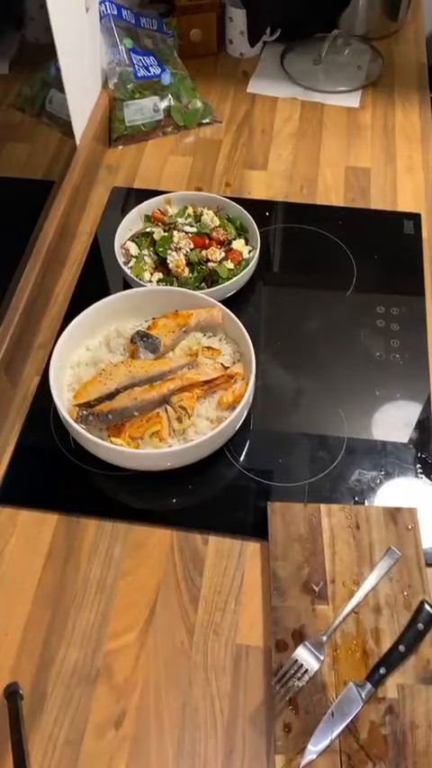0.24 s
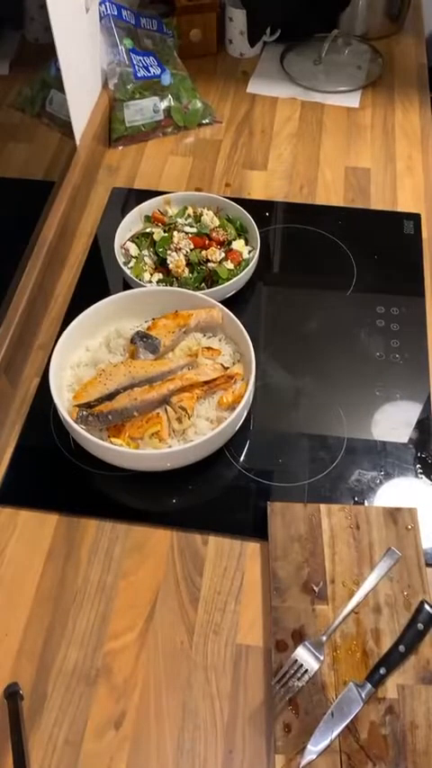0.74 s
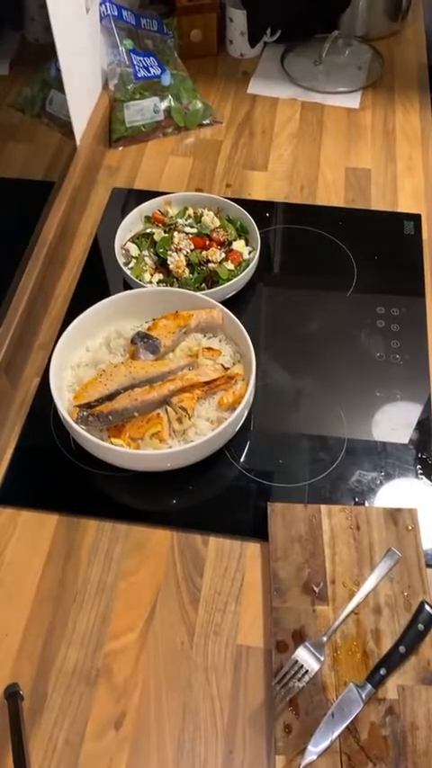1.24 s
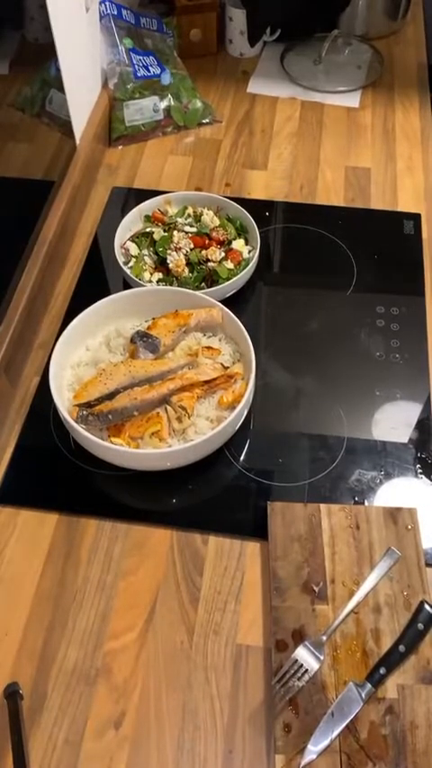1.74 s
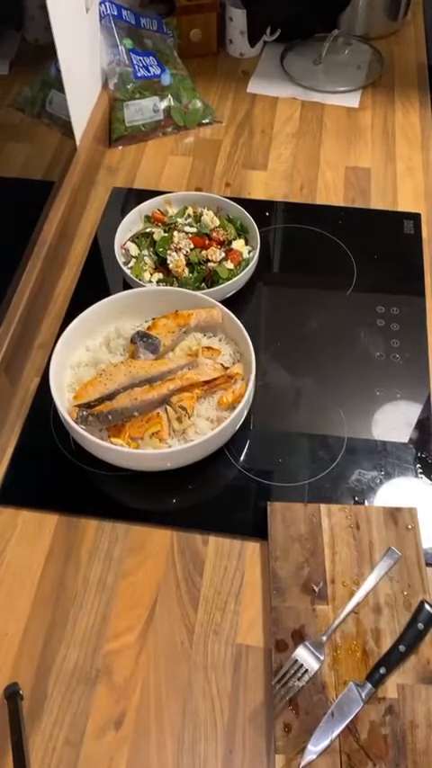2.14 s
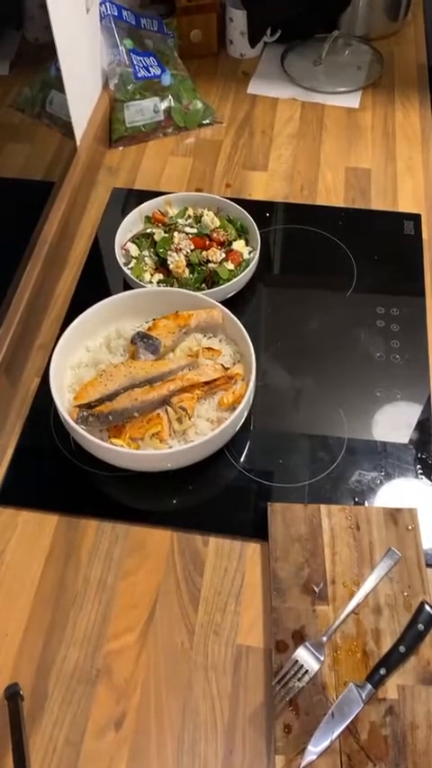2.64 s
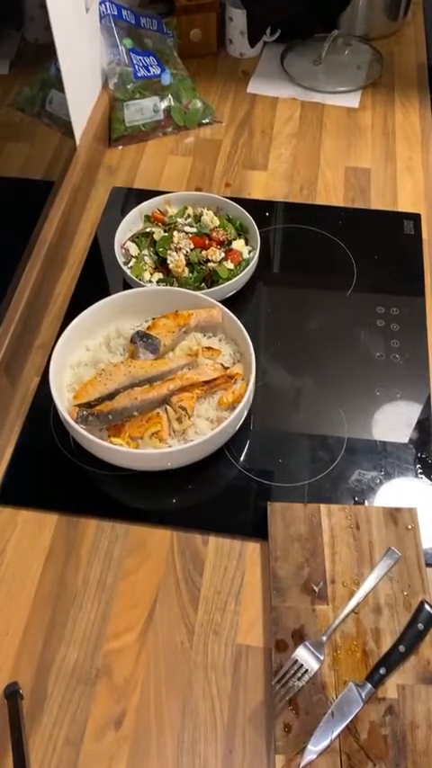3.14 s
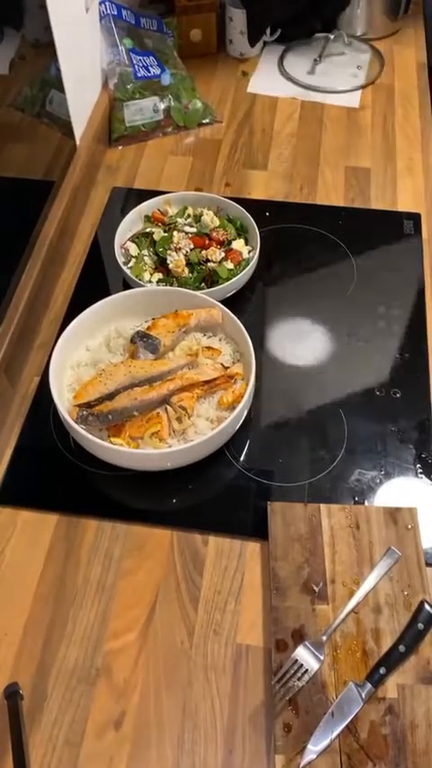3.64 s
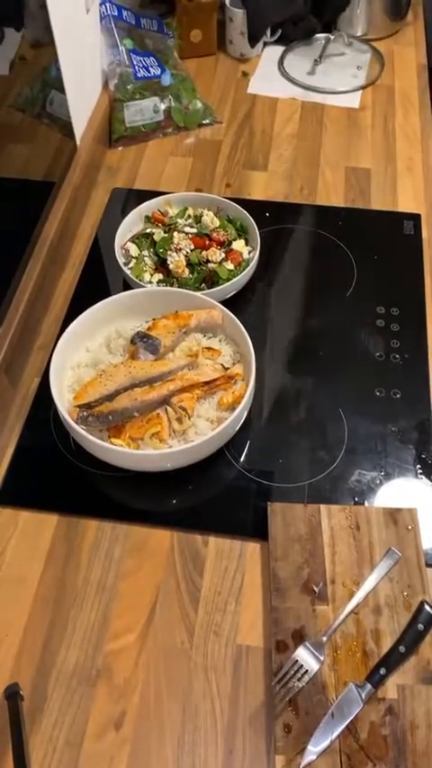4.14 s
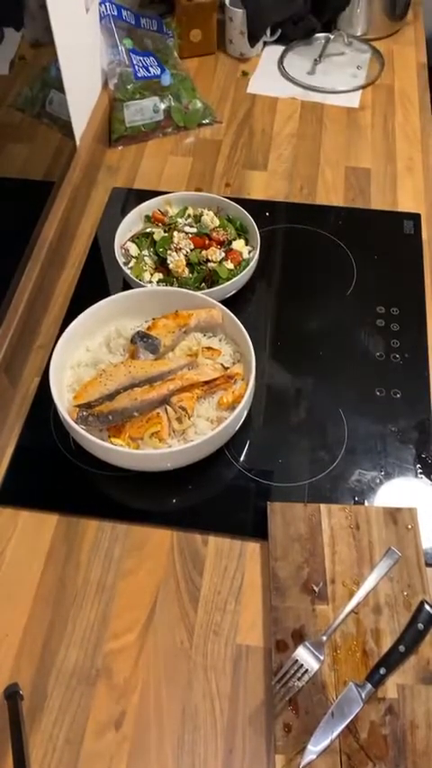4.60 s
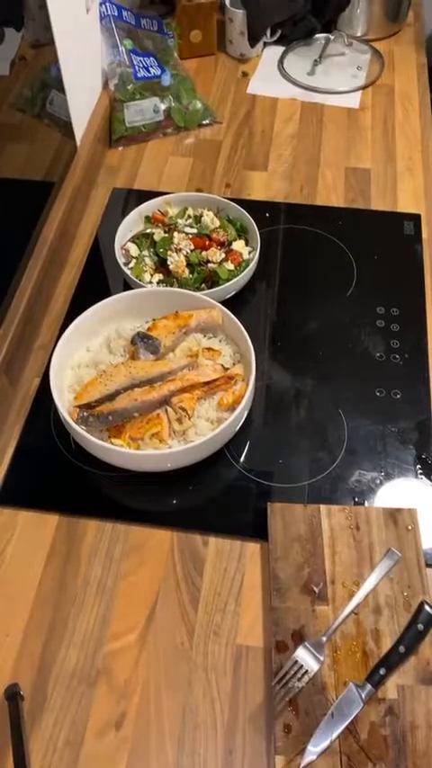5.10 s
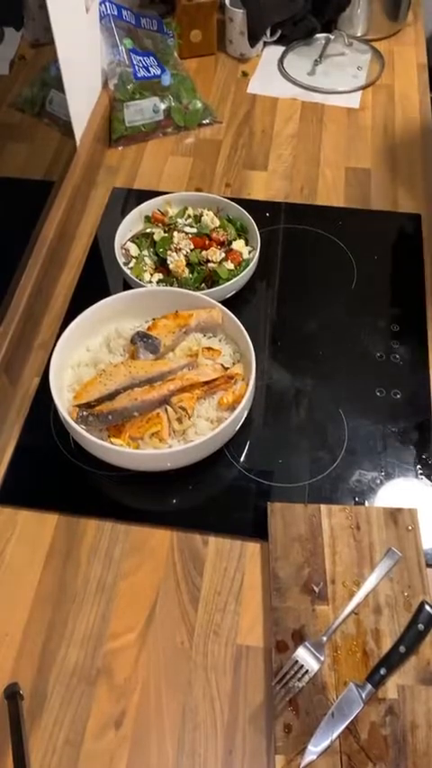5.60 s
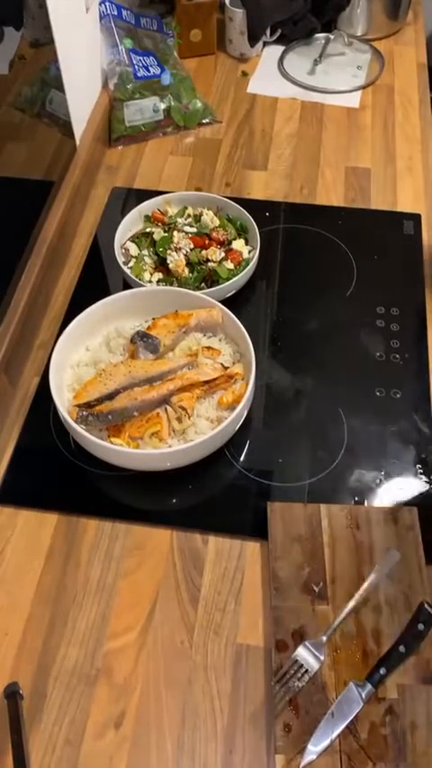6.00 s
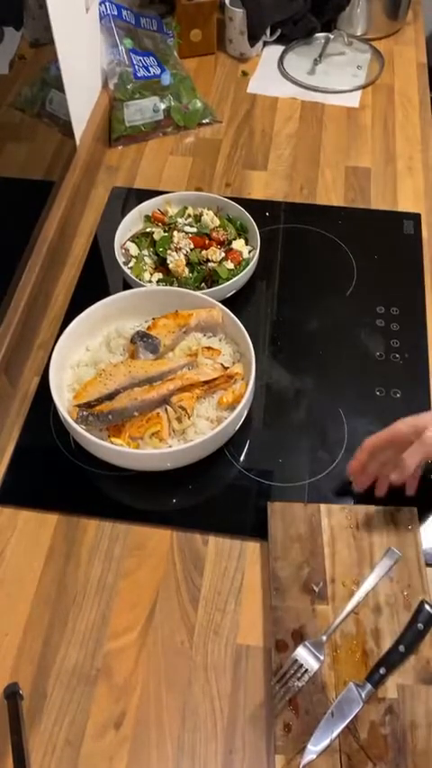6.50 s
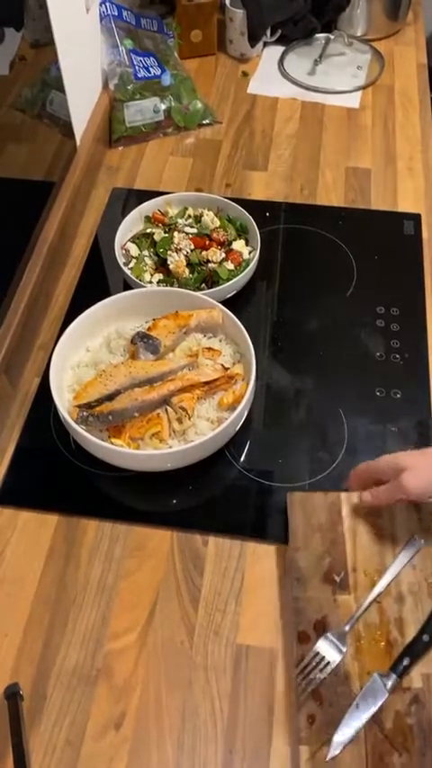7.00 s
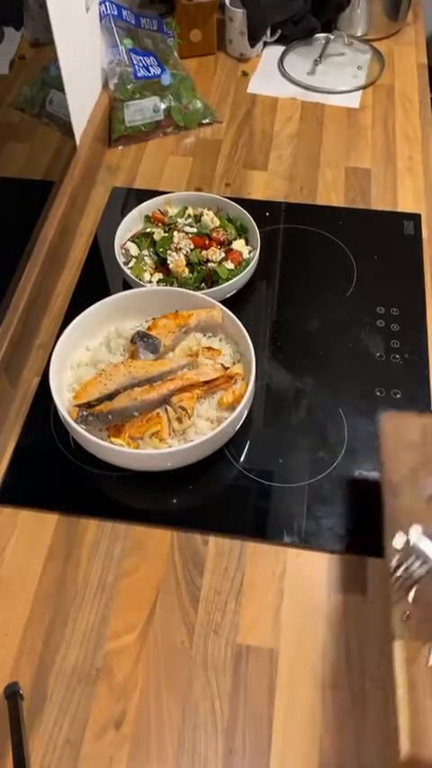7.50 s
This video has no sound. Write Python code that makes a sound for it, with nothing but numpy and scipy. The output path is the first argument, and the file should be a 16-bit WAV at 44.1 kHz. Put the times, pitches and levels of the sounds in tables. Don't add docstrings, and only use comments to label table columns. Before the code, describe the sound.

Kitchen handling: plate and cup clinks, a drawer thud, ringing glass, two heavy hollow door slams, cloth rustle, then a dragged board over steady hum.

```python
import sys
import numpy as np
from scipy import signal
from scipy.io import wavfile
from scipy.ndimage import uniform_filter1d, map_coordinates

SR = 44100
rng = np.random.default_rng(int(sys.argv[2]) if len(sys.argv) > 2 else 0)


def waveform_to_disk(signal):
    frames = np.transpose(np.atleast_2d(signal))
    scaled = np.clip(frames, -1, 1) * 32767
    samples = np.round(scaled).astype(np.int16)
    wavfile.write(sys.argv[1], SR, samples)


def elevation(decibels):
    levels = np.asarray(decibels, float)
    return 10 ** (levels / 20)


N = 341775


def evened(x):
    return x / np.sqrt(np.mean(x ** 2) + 1e-20)


def peaked(x):
    return x / np.max(abs(x))


def read(points, hz):
    f, value = np.transpose(points)
    return np.interp(np.log(hz + 1), np.log(f + 1), value)


def add(mix, s, sound):
    part = mix[max(round(s * SR), 0):][:len(sound)]
    part += sound[:len(part)]


def placed(rows, source, *settings):
    out = np.zeros(N)
    for s, *row in rows:
        add(out, s, source(*row, *settings))
    return out


def band(x, lo_hz, hi_hz):
    return signal.sosfilt(signal.butter(2, [lo_hz, min(hi_hz, SR / 2.1)], "band", fs=SR, output="sos"), x)


def ring(modes, size):
    t = np.arange(size) / SR
    return sum(elevation(db - 60 * t / np.clip(t60, .0005, .6)) * np.sin(2 * np.pi * hz * t)
               for hz, db, t60 in modes)


def as_modes(peaks):
    return [(hz, db, 2.2 / width) for hz, width, db in peaks]


def drift(rate_hz):
    steps = rng.standard_normal(400)
    at = np.arange(0, N + 256, 256)
    path = map_coordinates(steps, [at / SR * rate_hz], order=3)
    return evened(np.interp(np.arange(N), at, path))


def coloured(spectrum, patchy_db):
    frames, hz = N // 256 + 5, np.fft.rfftfreq(1024, 1 / SR)
    a, b, patches = rng.standard_normal((frames, 513, 3)).T
    patches = uniform_filter1d(patches, size=12, axis=0)
    patches = evened(uniform_filter1d(patches, size=14, axis=1))
    z = (a + 1j * b) * elevation(read(spectrum, hz)[:, None] + patchy_db * patches)
    return evened(signal.istft(z, nperseg=1024, noverlap=768)[1][:N])


def strokes(rows):
    t, stroke_db = np.arange(N) / SR, 22
    power = np.zeros(N)
    for s, db, rise, hold, fall in rows:
        away = np.maximum((s - t) / max(rise, .002), (t - s - hold) / max(fall, .002))
        power += elevation(db - stroke_db * np.clip(away, 0, 9)) ** 2
    return np.sqrt(power)


# [f/Hz, t60/s]
WALLS_T60 = [(100, 0.32), (300, 0.21), (1000, 0.28), (3000, 0.26), (8000, 0.25), (15000, 0.13)]


def kitchen(rise_s, late_db):
    hz, t, z = signal.stft(rng.standard_normal(20480), SR, nperseg=128)
    t60 = read(WALLS_T60, hz)[:, None]
    decay = elevation(-60 * t / t60) + elevation(late_db - 60 * t / (4.2 * t60))
    tail = signal.istft(z * decay, SR, nperseg=128)[1]
    tail = tail * (1 - np.exp(-(np.arange(len(tail)) / SR / max(rise_s, .0005)) ** 2))
    return tail / np.linalg.norm(tail)


def clinks(hits, modes, tick_db, dry_db, rise_s):
    tick = peaked(band(signal.unit_impulse(16000), 1100, 6400))
    rung = peaked(ring(modes, size=16000)) + elevation(tick_db) * tick
    straight = elevation(dry_db) * rung * np.minimum(np.arange(16000) / SR / rise_s, 1)

    def touch(db):
        wet = peaked(signal.fftconvolve(rung, kitchen(rise_s, late_db=-30)))
        add(wet, 0, straight)
        return elevation(db) * wet
    return placed(hits, touch)


def leaves(hits, modes):
    t, rung = np.arange(16000) / SR, ring(modes, size=16000)

    def swelling(db, rise_s):
        return elevation(db) * peaked(rung * (1 - np.exp(-(t / max(rise_s, .001)) ** 2)))
    return placed(hits, swelling)


# [t/s, level/dB]
MAINS_LEAD = [(0, 0), (5.3, 1), (5.7, 3), (6.4, 4.5), (6.7, 1), (7.75, 1.5)]


def mains_lead_db():
    return np.interp(np.arange(N) / SR, *np.transpose(MAINS_LEAD))


# [f/Hz, level/dB rms]
HUM = [(40.7, -64), (81.3, -52.5), (100, -59), (121.7, -59.5), (162.6, -63.5), (202, -75), (263.5, -65),
       (282, -72), (300, -70.5), (365, -74), (421, -73), (447, -71), (488, -73), (568, -79), (690, -77),
       (772, -79), (1340, -80), (1630, -79), (1645, -76), (1662, -80), (1707, -82), (1809, -81),
       (1852, -79)]
# [t/s, level/dB]
HUM_SWELL = [(0, 0), (.6, -0.5), (1.4, -1.5), (2.3, 0), (3.2, 1), (4.199, 2), (5.6, 4.5), (6.2, -2),
             (6.7, 1), (7.75, -0.5)]
# [f/Hz, level/dB per Hz]
AIR = [(100, -13.5), (170, -10.5), (220, -20.5), (268, 2), (344, -13), (466, -5), (553, -11), (906, -13),
       (1510, -17), (1660, -16.5), (2580, -19.5), (7620, -28), (16000, -45)]


def fridge():
    t, lead_db = np.arange(N) / SR, mains_lead_db()
    s, swell_db = np.transpose(HUM_SWELL)
    lines = np.zeros(N)
    for hz, db in HUM:
        share = (hz == 100) - (110 < hz < 170)
        level = elevation(db + 2.3 * drift(8) + lead_db * share) * np.sqrt(2)
        lines += level * np.sin(2 * np.pi * hz * t + .3 * drift(5))
    swell = elevation(np.interp(t, s, swell_db - np.mean(swell_db)))
    rumble = elevation(-63) * evened(band(rng.standard_normal(N), 61, 110))
    return lines * swell + rumble + elevation(-59) * coloured(AIR, patchy_db=.9)


# [f/Hz, width/Hz, level/dB rms]
WHINE = [(1308, 30, -79), (1640, 36, -75), (1810, 44, -76), (2050, 40, -80)]


def fan():
    air = rng.standard_normal(N)
    whines = sum(elevation(db) * evened(band(air, hz - width / 2, hz + width / 2)) for hz, width, db in WHINE)
    return elevation(-mains_lead_db()) * whines


# [f/Hz, level/dB per Hz]
CLOTH = [(900, -30), (1800, -11), (3200, -3), (5500, 0), (8000, -2), (10500, -6), (13000, -8), (16000, -10)]
# [t/s of the top, level/dB, rise/s, hold/s, fall/s]
RUSTLE = [(.142, -47, 0.039, 0.0045, 0.093), (.26, -64, .03, 0.091, 0.92), (3.23, -65, .05, .005, .06),
          (4.878, -57, .05, 0.088, 0.14), (5.172, -38.5, 0.061, 0.03, 0.06),
          (5.42, -53, 0.022, 0.11, 0.098), (5.674, -51, 0.05, .005, 0.38), (5.852, -53, .07, .005, 0.25),
          (6.432, -57, .012, .003, 0.05), (6.5, -58, 0.027, 0.0028, .07), (6.664, -59.5, .2, 0.022, 0.17),
          (5.55, -63.5, .1, 0.55, 0.11)]


def rustle():
    hiss = coloured(CLOTH, patchy_db=1.1) * elevation(1.2 * drift(45))
    low, top = evened(band(hiss, 1200, 10500)), evened(band(hiss, 9000, 16000))
    speed = strokes(RUSTLE)
    return speed * low + elevation(-28.5) * speed ** 0.66 * top


# [t/s, peak/dB]
TAP = [(2580, 410, -13), (3600, 560, 16), (4030, 300, -3), (5500, 2200, -3.5), (7100, 1400, -12),
       (11000, 3000, -26)]
TAP_HITS = [
    (0.965, -44.5),
    (3.575, -50.5),
    (6.4312, -51),
    (6.4934, -44.5),
    (7.5794, -64),
]
# [t/s, peak/dB]
TICK = [(4650, 900, -4), (6000, 1200, -1), (7440, 1100, 3), (10000, 2500, -5.5)]
TICK_HITS = [(0.324, -47.5), (1.178, -53), (6.4336, -52.5), (6.4954, -50.5), (7.7074, -57.5), (3.386, -54)]
# [t/s, peak/dB]
LID = [(1300, 150, -8), (1650, 90, -3), (2090, 90, 1), (2470, 150, -1)]
LID_HITS = [
    (.196, -49),
    (.27, -54),
    (.462, -47),
]


def taps():
    return (clinks(TAP_HITS, as_modes(TAP), tick_db=-11, dry_db=0, rise_s=0.003)
            + clinks(TICK_HITS, as_modes(TICK), tick_db=-13, dry_db=-3, rise_s=0.0018)
            + clinks(LID_HITS, as_modes(LID), tick_db=-18, dry_db=-2.5, rise_s=0.0037))


# [t/s, peak/dB]
PLATE = [(1600, 320, -7), (2220, 140, 12.5), (2600, 240, 14), (3030, 210, 19), (3200, 200, 18.5),
         (3600, 150, 11), (7030, 450, 20), (8000, 250, 7), (10660, 1000, 20)]
PLATE_HITS = [
    (0.001, -35.5),
]
PLATE_BOUNCES = [
    (.009, -41.5),
    (.021, -46.5),
    (.03, -48),
]


def plate():
    return (clinks(PLATE_HITS, as_modes(PLATE), tick_db=2, dry_db=17.5, rise_s=0.0013)
            + clinks(PLATE_BOUNCES, as_modes(PLATE), tick_db=-12, dry_db=23, rise_s=0.0012))


# [t/s, peak/dB]
CUP = [(2270, 290, -13), (2540, 150, 11), (2985, 140, 15.5), (3160, 120, -3), (4450, 300, -8),
       (5720, 130, -12), (1660, 48, -29), (6600, 220, -9), (7660, 400, -13), (9150, 300, 2),
       (9600, 370, -21)]
CUP_HITS = [
    (0.1215, -36.5),
    (0.2535, -43.5),
    (0.3855, -46.5),
    (6.8314, -55),
]
CUP_BOUNCES = [
    (.143, -43),
]
# [t/s, peak/dB]
SAUCER = [(5670, 90, -5), (5770, 89, -1), (6070, 130, -5), (6350, 200, -15)]
SAUCER_HITS = [
    (0.1212, -37),
]


def cup():
    return (clinks(CUP_HITS, as_modes(CUP), tick_db=-2, dry_db=6, rise_s=0.0026)
            + clinks(CUP_BOUNCES, as_modes(CUP), tick_db=-4, dry_db=11, rise_s=0.002)
            + clinks(SAUCER_HITS, as_modes(SAUCER), tick_db=-7, dry_db=-6, rise_s=0.0023))


# [t/s, peak/dB]
GLASS = [(1716, -9, 0.11), (1960, -9, .12), (2300, -7, 0.1), (2795, 1.5, 0.21), (2840, -2.5, 0.16),
         (4920, -4.5, 0.32), (4880, -10, 0.15), (5180, -9, .15), (6440, -10, 0.094), (6580, -11, 0.13),
         (7700, -18, .12), (9180, -26, 0.2), (9750, -29, .2), (13310, -26, .12)]
GLASS_HITS = [
    (2.829, -30.5),
]
JAR = [(1790, -18, 0.3), (2850, -11, 0.34), (3206, -17, 0.35), (3106, -2, 0.3), (4540, -0.5, 0.14),
       (5195, -1, 0.16), (6300, -7, 0.12), (8296, -21, .2), (8520, -21, 0.14), (9300, -20, 0.2),
       (11280, -21, .2), (11670, -19, .2), (11950, -23, .15), (14810, -23, .25)]
JAR_HITS = [
    (2.846, -37),
]
# [t/s, peak/dB]
CLANG = [(2900, 290, 1), (4900, 400, -0.5), (6540, 300, -4.5), (8400, 400, -15), (9300, 400, -18),
         (11600, 500, -13)]
CLANG_HITS = [
    (2.838, -35),
    (2.847, -33.5),
]
# [t/s, peak/dB, rise/s]
CHIME = [(1760, 2, 0.38), (1735, -2, 0.36), (3101, -3, .15), (2789, -7, .15), (4545, -3, .11),
         (4600, -8, .1), (4990, -6, .12), (6616, -8, .12), (11400, -20, .1), (11800, -22, .1)]
CHIME_HITS = [
    (2.857, -35, 0.0056),
    (2.89, -48, .005),
]


def glasses():
    return (clinks(GLASS_HITS, GLASS, tick_db=-18, dry_db=8, rise_s=0.006)
            + clinks(JAR_HITS, JAR, tick_db=-15, dry_db=11.5, rise_s=0.0067)
            + clinks(CLANG_HITS, as_modes(CLANG), tick_db=-25, dry_db=-6, rise_s=0.006)
            + leaves(CHIME_HITS, CHIME))


# [t/s, peak/dB]
SPOON = [(4060, -8, .08), (4070, -5.5, 0.0504), (4370, -1, .03), (4810, 8.5, 0.017), (4660, -2.5, .03),
         (6010, -7.5, 0.027), (6800, -10.5, 0.045), (7460, -10.5, 0.08), (7800, 1.5, 0.056),
         (9050, 2.5, 0.02), (9700, -5, 0.046), (10000, -10.5, .05), (13200, -17.5, .05), (14700, -9.5, .04)]
SPOON_HITS = [
    (4.0312, -36),
]
# [t/s, peak/dB]
FORK = [(1417, 0, .05), (2490, 4, 0.055), (2756, 2, 0.037), (3590, -13, 0.046)]
FORK_HITS = [
    (6.848, -55),
    (6.998, -54.5),
    (7.158, -45.5),
    (7.186, -56),
    (7.212, -57),
    (7.292, -59),
]
# [t/s, peak/dB, rise/s]
PRONG = [(1395, 0, 0.055)]
PRONG_HITS = [
    (6.99, -58, .005),
    (7.187, -50, 0.0044),
]


def cutlery():
    return (clinks(SPOON_HITS, SPOON, tick_db=2.5, dry_db=13.5, rise_s=0.003)
            + clinks(FORK_HITS, FORK, tick_db=-18, dry_db=5, rise_s=0.0015)
            + leaves(PRONG_HITS, PRONG))


# [t/s, peak/dB, rise/s]
RACK = [(2630, -2, .08), (3060, 0, .09), (3483, -1, 0.077), (4150, -5.5, .07)]
RACK_HITS = [
    (4.374, -21.5, .005),
    (4.402, -25.5, .006),
    (5.098, -20.5, 0.0041),
]
BOWLS = [(3784, 0.5, .1), (3990, -4, .1), (4301, -3, .1), (4620, -4.5, .08), (4910, -3, .1),
         (5320, -8.5, .07), (5620, -7.5, .1)]
BOWL_HITS = [(4.372, -31, .005), (4.386, -30, .004), (4.728, -34, .006), (4.745, -36, .005),
             (4.874, -54, .004), (5.096, -33, .004), (5.114, -36, .004)]
BOTTLE = [(2640, 0, .05)]
BOTTLE_HITS = [
    (5.129, -26, 0.0072),
]
TIN = [(787, -3.5, .08), (985, -1, .06), (1250, -1, .05), (1495, -3, 0.065), (2100, -4, 0.064),
       (2390, -6, 0.055)]
TIN_HITS = [
    (2.770, -44, 0.013),
    (2.83, -37, .004),
    (2.85, -40, .006),
    (7.165, -46, .004),
    (7.19, -48, .004),
]


def stored_ware():
    return (leaves(RACK_HITS, RACK) + leaves(BOWL_HITS, BOWLS)
            + leaves(BOTTLE_HITS, BOTTLE) + leaves(TIN_HITS, TIN))


# [f/Hz, width/Hz, level/dB]
BOARD = [(750, 43, -10), (908, 39, -4), (1210, 280, 3), (1460, 180, -6), (1940, 51, 1), (2450, 80, -8),
         (2910, 96, -2), (3880, 150, -4), (4900, 160, -2), (5600, 200, -11)]
# [t/s of the top, level/dB, rise/s, hold/s, fall/s]
DRAG = [
    (7.0, -60.5, 0.18, 0.028, .05),
    (7.07, -51, 0.038, 0.064, .03),
    (7.162, -50.5, 0.0098, 0.027, 0.027),
    (7.2, -54.5, .02, .01, 0.15),
]


def board():
    clicks = (rng.random(N) < 1600 / SR) * elevation(1.2 * rng.exponential(1, N)) * rng.choice([-1, 1], N)
    slips = clicks + 0.061 * rng.standard_normal(N)
    low = signal.oaconvolve(slips, ring(as_modes(BOARD[:3]), size=6000))[:N]
    upper = evened(signal.oaconvolve(slips, ring(as_modes(BOARD[3:]), size=6000))[:N])
    upper = upper + elevation(1.5) * evened(band(slips, 1100, 3300))
    t, skid_s, lift_s, skid_rise_s = np.arange(N) / SR, 7.084, 7.14, 0.0049
    gripped_db, upper_db, fade_db_per_s = -31, -5.5, 90
    free = np.clip(np.minimum(t - skid_s, lift_s - t) / skid_rise_s, elevation(gripped_db), 1)
    free = free * elevation(upper_db - fade_db_per_s * np.clip(t - skid_s, 0, .1))
    return strokes(DRAG) * (evened(low) + free * upper)


# [t/s of the top, level/dB, rise/s, hold/s, fall/s]
SING = [
    (7.074, -51, .018, 0.059, .02),
]


def singing():
    sing_hz = 906
    flutter = evened(band(rng.standard_normal(N), 13, 90))
    tone = np.sin(2 * np.pi * sing_hz * np.arange(N) / SR + .4 * flutter)
    return strokes(SING) * np.sqrt(2) * elevation(2.2 * flutter) * tone


# [t/s, peak/dB, rise/s]
EDGE = [(633, -7, 0.14), (730, -7, .12), (892, 3, 0.09), (910, 0, 0.12)]
EDGE_HITS = [
    (7.162, -38, 0.0054),
    (7.192, -44, 0.0037),
]


def rim():
    return leaves(EDGE_HITS, EDGE)


def boom(db, hz, length_s, rise_s, upper_db):
    t = np.arange(20000) / SR
    modes = ring([(hz, 0, .6), (1.2 * hz, -12, .5), (1.6 * hz, upper_db, .2)], size=20000)
    swell = (1 - np.exp(-(t / max(rise_s, .002)) ** 2)) * elevation(-60 * (t / length_s) ** 1.77)
    return elevation(db) * peaked(modes * swell)


def push(db, length_s):
    u = np.arange(4000) / SR / max(length_s, .003) * np.pi
    return elevation(db) * peaked(band(u * (2 - u) * np.exp(-u), 34, 3000))


# [t/s, peak/dB, f/Hz, ring/s, rise/s]
CARCASS = [(2.367, -33.5, 113, 0.43, 0.019), (2.440, -17, 129.2, 0.23, 0.0034),
           (2.772, -28.5, 132.7, 0.092, 0.013), (3.604, -29, 117.7, 0.18, 0.025),
           (3.830, -42, 103, 0.16, .015), (4.363, -14.5, 117.6, 0.054, 0.016),
           (4.388, -16.5, 95.7, 0.086, 0.013), (4.450, -32.5, 112, 0.44, 0.0084),
           (4.511, -35, 106.6, .98, 0.075), (4.737, -21, 110.3, 0.35, 0.0094),
           (4.879, -29.5, 112.7, 0.42, 0.012), (5.098, -12, 107, .15, 0.016),
           (5.160, -9.5, 128, 0.22, 0.0058), (5.255, -28.5, 120, 0.23, .02),
           (5.432, -26.5, 124.6, 0.15, 0.02)]
# [t/s, peak/dB, f/Hz, ring/s, rise/s]
SHELVES = [(2.444, -20, 189.3, 0.17, 0.0061), (2.919, -28, 160, 0.069, 0.01),
           (3.385, -31, 274, 0.18, 0.0026), (3.390, -35, 154, 0.15, 0.0047), (3.825, -40, 188, 0.3, 0.0025),
           (3.836, -37, 275.5, 0.21, 0.0055), (4.496, -38.5, 191, 0.73, 0.023),
           (4.74, -30.5, 186, 0.13, 0.019), (4.868, -35.5, 151, 0.055, .008),
           (2.775, -37, 310, 0.085, 0.01), (4.367, -24.5, 392, 0.089, 0.0066),
           (5.092, -20, 194, 0.11, 0.003), (5.165, -32.5, 549, 0.25, 0.012), (5.171, -25, 258, 0.19, 0.022),
           (6.894, -43.5, 289, 0.049, 0.0049), (7.081, -43.5, 252.7, 0.24, 0.014),
           (7.641, -48.5, 650, 0.044, 0.0023)]
# [t/s, peak/dB, length/s]
PUSHES = [
    (4.365, -25, 0.014),
    (4.384, -41, 0.011),
    (4.745, -18.5, 0.0066),
    (5.11, -36, 0.0059),
    (5.436, -33, 0.0053),
]


def carcass():
    return placed(CARCASS, boom, -13.5) + placed(SHELVES, boom, -10) + placed(PUSHES, push)


# [t/s, peak/dB, rise/s]
FRONT = [(258, -4.5, 0.18), (368, -3, 0.17), (434, -7, 0.2), (558, -14, 0.2), (705, -13, 0.16),
         (750, -15.5, 0.25), (946, -8.5, 0.16), (1244, -16, .1), (1517, -16, 0.17), (1800, -11, 0.097),
         (2215, -18, 0.15)]
FRONT_HITS = [
    (2.441, -17, 0.016),
]
TRAY = [(306, -0.5, 0.27), (394, 0.5, 0.25), (744, -2, 0.35), (1093, 2, .2), (1314, -4, 0.17),
        (1545, -12, .3), (1780, -10, .25), (2050, -11, .16), (2422, -19, .16)]
TRAY_HITS = [
    (2.352, -26, 0.015),
]


def drawer():
    return leaves(FRONT_HITS, FRONT) + leaves(TRAY_HITS, TRAY)


# [t/s, peak/dB, rise/s]
DOOR = [(780, -3, 0.2), (815, -8, .15), (1265, -3, 0.12), (1630, -7, 0.064), (1660, -12, .12),
        (1884, -2.5, 0.098), (2110, -8, 0.12), (2385, 5, 0.043), (2600, -7, 0.11), (2973, -10, .12),
        (3126, -10, .12), (3607, -16, .1), (580, -8.5, 0.22)]
DOOR_HITS = [
    (5.088, -10, 0.0056),
    (4.722, -26, .006),
]
TALL = [(311.3, -7, .17), (753, -10, 0.16), (931, -15, 0.27), (1003, -8, 0.22), (1216, -14, 0.22),
        (1408, -0.5, 0.066), (1486, 3.5, 0.062), (1675, -11.5, .2), (2067, 1.5, 0.072), (2200, -5, 0.049),
        (2555, -8, 0.072), (3480, -17.5, 0.065)]
TALL_HITS = [
    (4.364, -7.5, 0.0033),
    (4.719, -21, 0.0062),
]
REBOUND = [(479, -4, 0.099), (1052, 0, .15), (1599, 0, .18), (1700, -1.5, .16), (1789, -2, .16),
           (2280, -1, .18), (2370, -4, .15), (2600, -5, .15)]
REBOUND_HITS = [
    (4.378, -19, .01),
]


def door_leaves():
    return leaves(DOOR_HITS, DOOR) + leaves(TALL_HITS, TALL) + leaves(REBOUND_HITS, REBOUND)


# [t/s, peak/dB]
LATCH = [(644, 180, -8), (795, 62, -3.5), (1020, 86, -2.5), (1225, 200, 10.5), (1320, 64, -6),
         (1578, 98, 7.5), (1906, 90, -12), (2090, 87, -0.5), (2240, 51, -5), (2784, 60, -3),
         (3070, 98, -11), (3520, 100, -6.5)]
LATCH_HITS = [
    (4.7185, -24.5),
    (5.076, -47.5),
    (5.087, -11),
    (5.418, -38.5),
]
# [t/s, peak/dB]
SNAP = [(447, 42, -14.5), (816, 93, -5), (1020, 200, 3), (1387, 56, 2), (1486, 90, 5.5), (1608, 45, -15),
        (1885, 58, -2), (2140, 120, 4.5), (2200, 142, 6.5), (2542, 100, -23), (3520, 109, -16)]
SNAP_HITS = [
    (4.354, -34.5),
    (4.3645, -7),
]


def catches():
    latch = clinks(LATCH_HITS, as_modes(LATCH), tick_db=-36, dry_db=19.5, rise_s=0.0053)
    snap = clinks(SNAP_HITS, as_modes(SNAP), tick_db=-37.5, dry_db=12.5, rise_s=0.0025)
    return band(latch, 70, 5500) + snap


# [t/s, peak/dB]
SEAL = [(5640, 500, -6), (6340, 500, 0), (7340, 640, 3), (11000, 3000, -20), (14000, 3000, -22)]
SEAL_HITS = [
    (5.150, -37),
    (5.157, -47),
    (5.167, -32),
]
# [t/s, peak/dB]
HINGE = [(9500, 900, -7), (11200, 900, -1), (12800, 900, 0), (14600, 900, -0.5)]
HINGE_HITS = [(2.357, -62), (2.441, -58), (4.365, -44), (4.722, -51), (5.094, -50), (5.157, -37),
              (5.167, -46)]


def seal_and_hinges():
    seal = clinks(SEAL_HITS, as_modes(SEAL), tick_db=-25, dry_db=28, rise_s=0.0026)
    hinge = clinks(HINGE_HITS, as_modes(HINGE), tick_db=-40, dry_db=6, rise_s=0.003)
    return band(seal, 4000, 9400) + hinge


def knock(db, dull_db, bright_db, hz):
    blow = signal.unit_impulse(4096)
    panel = band(band(blow, hz / 3.37, hz * 1.72), 60, 8900)
    dull = band(blow, 90, 547)
    tick = band(band(band(blow, 2740, 9000), 70, 8100), 65, 9000)
    echoes = kitchen(rise_s=0.007, late_db=-28.5)
    echoes = echoes * (1 + 0.246 * np.exp(-np.arange(len(echoes)) / SR / 0.0028))
    parts = [(db - 2.5, panel), (dull_db + 0.5, dull), (bright_db, tick)]
    return sum(elevation(part_db) * peaked(signal.fftconvolve(part, echoes)) for part_db, part in parts)


# [t/s, peak/dB, dull/dB, bright/dB, panel f/Hz]
KNOCKS = [(2.349, -19, -24.5, -53, 980), (2.435, -17, -16, -51, 1020), (2.757, -39.5, -33.5, -66, 1190),
          (2.916, -50, -34, -56, 1730), (3.385, -46, -39.5, -67, 1800), (3.59, -48, -37, -52, 807),
          (3.648, -60, -45.5, -56.5, 969), (3.822, -67, -45.5, -56, 770), (4.362, -5, -12, -29.5, 1600),
          (4.719, -15.5, -19.5, -42.5, 1320), (4.866, -36.5, -35.5, -59, 910),
          (5.087, -8.5, -15, -45, 1600), (5.156, -21, -21, -29, 725), (5.415, -35.5, -50, -61, 1210),
          (6.889, -61, -44.5, -81, 1010), (7.643, -74, -54.5, -77, 730)]


def knocks():
    return placed(KNOCKS, knock)


def scene():
    near = rustle() + board()
    near_wet = elevation(-14) * signal.fftconvolve(near, kitchen(0.0037, late_db=-35))[:N]
    background = fridge() + fan()
    ware = taps() + plate() + cup() + glasses() + cutlery() + stored_ware()
    doors = carcass() + drawer() + door_leaves() + catches() + seal_and_hinges() + knocks()
    return (background + near + near_wet + singing() + rim() + ware + doors)[None]


def low_pass(x):
    return signal.sosfilt(signal.butter(12, 15780, fs=SR, output="sos"), x)


def record(dry):
    mix = signal.sosfilt(signal.butter(4, 46, "high", fs=SR, output="sos"), dry)
    return low_pass(mix)


dry = scene()
out = record(dry)
waveform_to_disk(out)
```